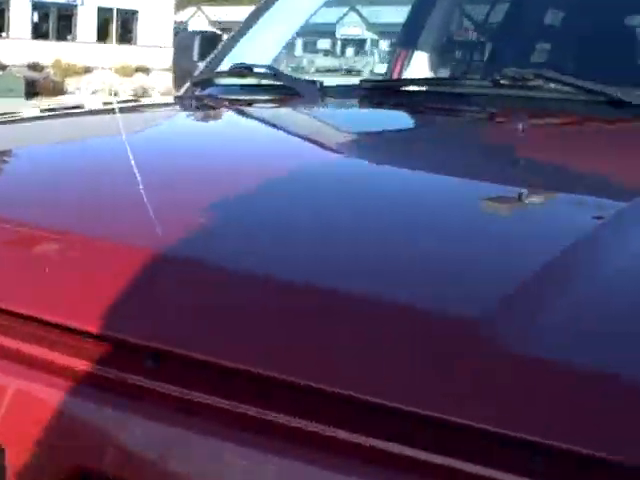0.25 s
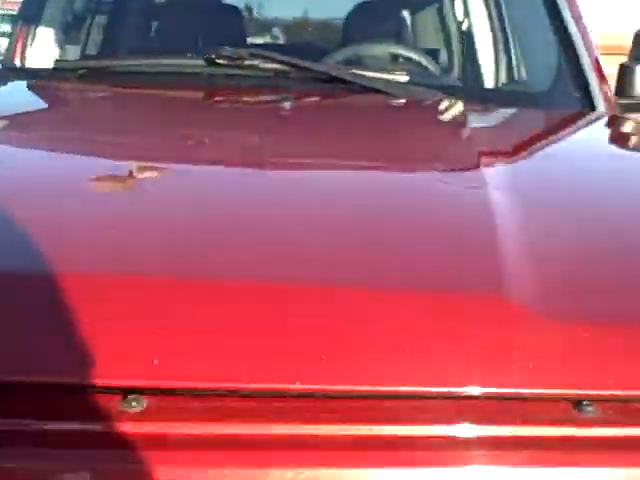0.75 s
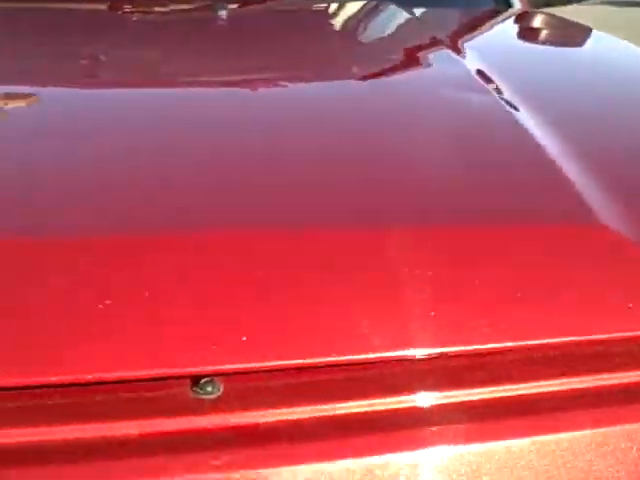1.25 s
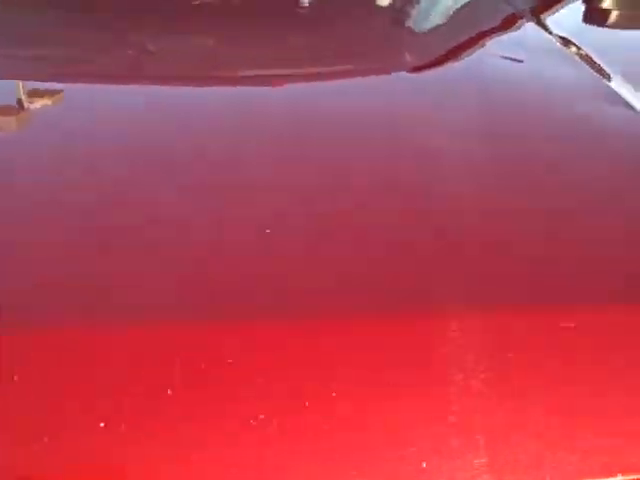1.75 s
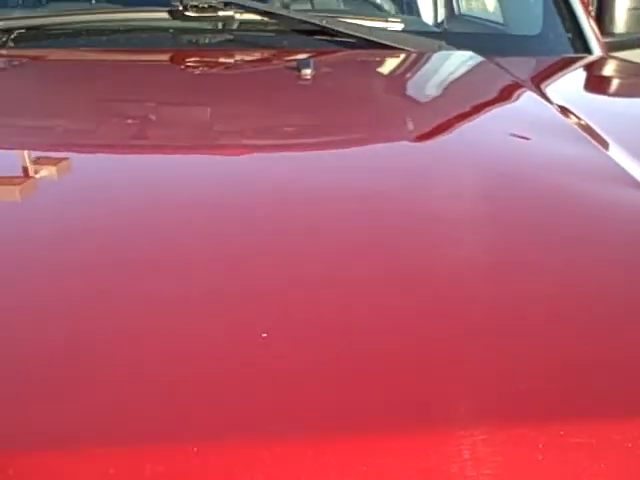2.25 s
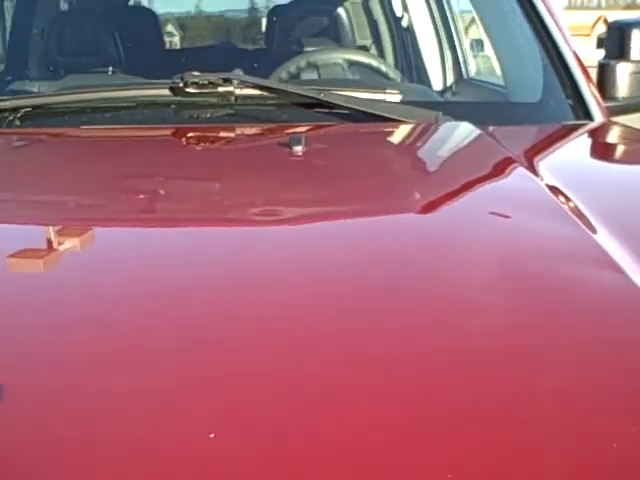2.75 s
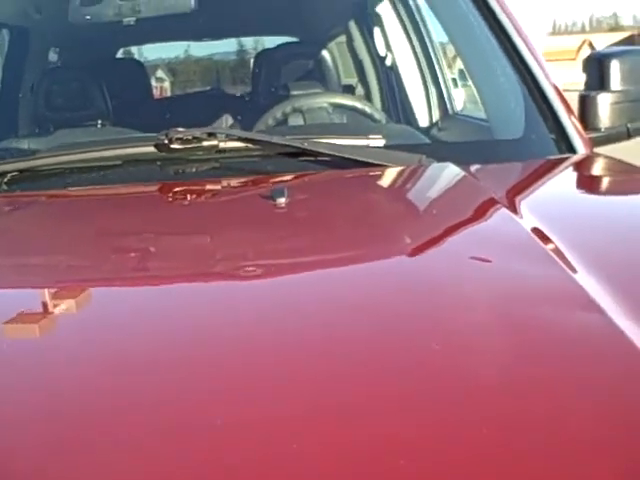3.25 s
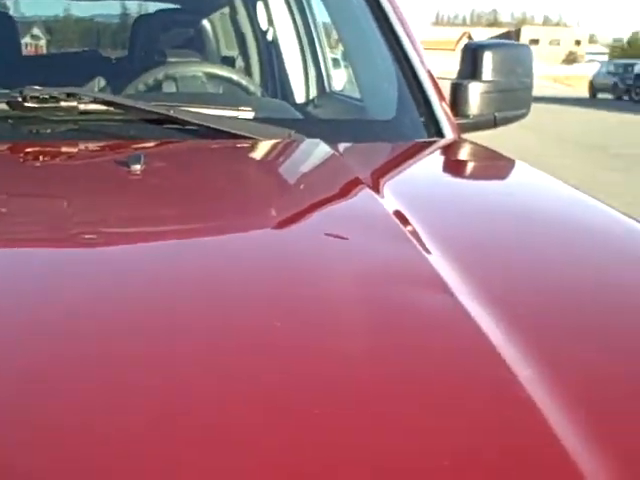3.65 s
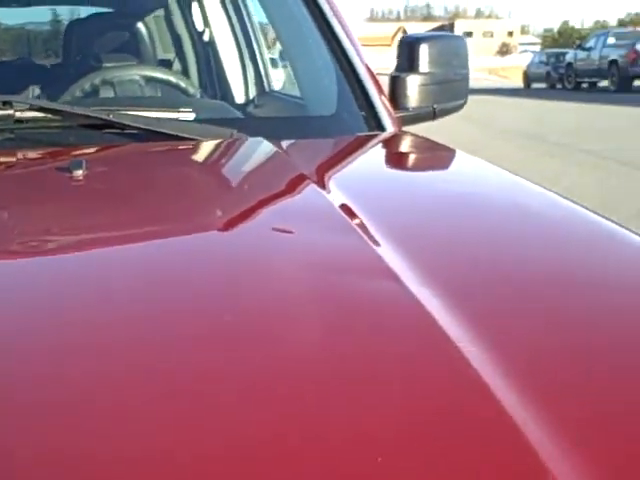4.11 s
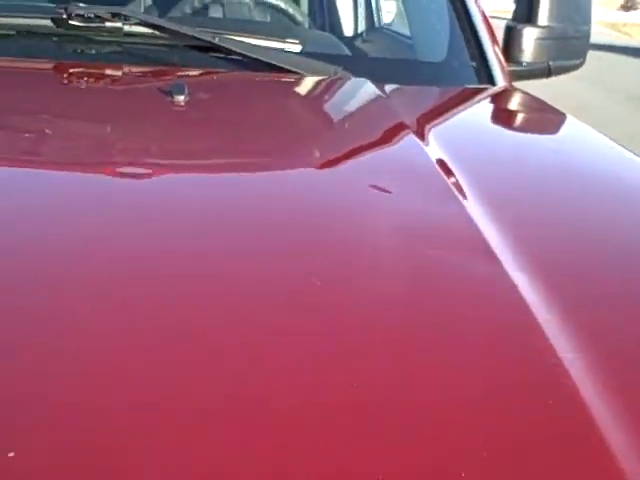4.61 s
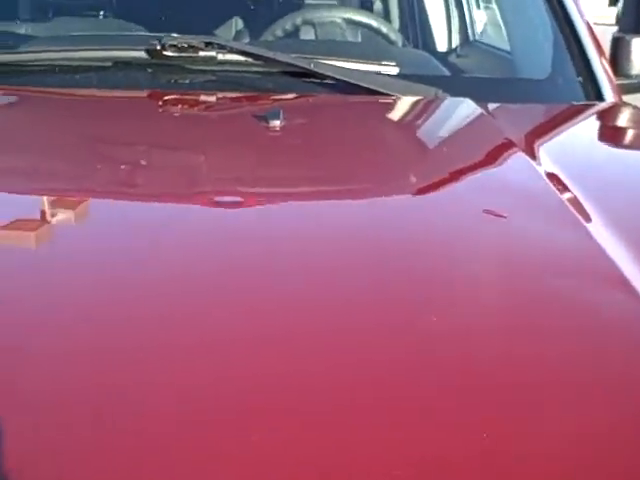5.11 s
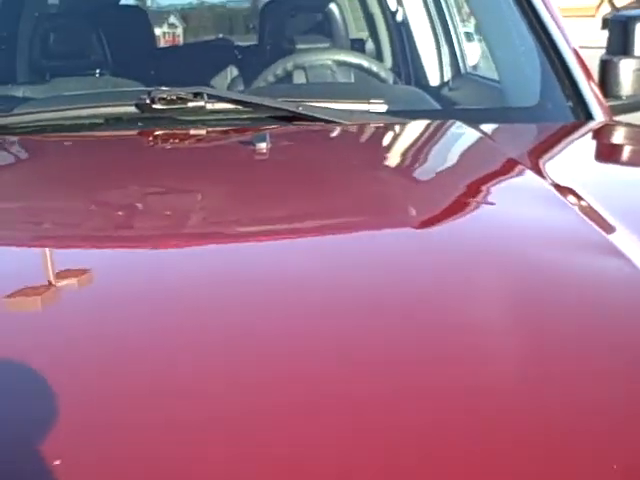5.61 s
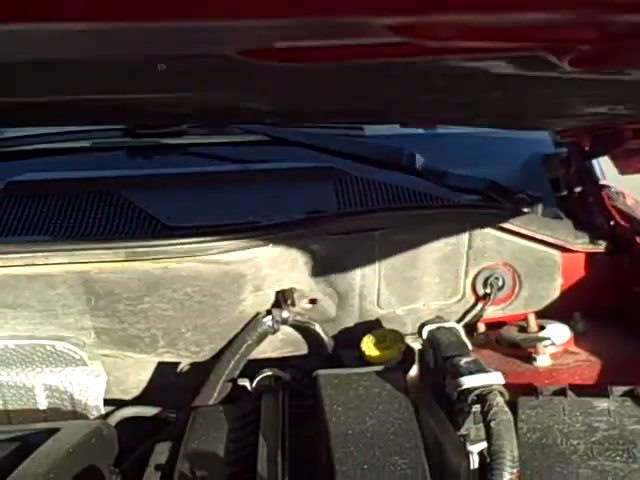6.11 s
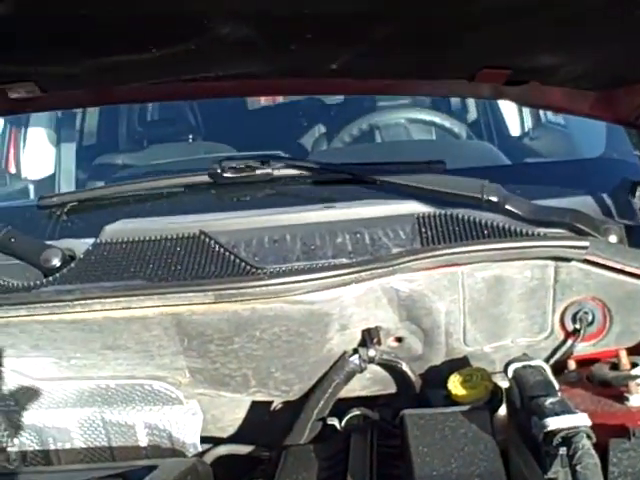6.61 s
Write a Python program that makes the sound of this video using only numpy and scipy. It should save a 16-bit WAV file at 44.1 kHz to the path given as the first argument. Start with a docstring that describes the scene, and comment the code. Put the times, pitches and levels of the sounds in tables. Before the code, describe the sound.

Close outdoor handling of a car hood: small clicks, a sharper double click and soft knocks, cloth rustle, gritty lever rubbing. A hard ringing clank pops the hood midway; later a rising creak leads to a bright metal snap, then short hinge groans and ticks. Faint wind, traffic and growing far engine hum underneath.

```python
"""A car hood is unlatched and lifted on an open lot: gusting wind, far traffic, a car drawing away, and a far
engine hum of wavering sines that mostly grows. Fingers click and rub at the latch (noise bursts, lever modes,
stick-slip pulses) and sleeves rustle; the hood pops up with a ringing clank (banded noise, modes, wash). The
safety catch creaks and snaps free, then the hinges groan and tick as the hood rises."""
import sys
import numpy as np
from scipy import signal
from scipy.fft import rfft, irfft, next_fast_len
from scipy.io import wavfile
from scipy.ndimage import uniform_filter1d

SR = 44100
rng = np.random.default_rng(int(sys.argv[2]) if len(sys.argv) > 2 else 0)


def log_audio(samples):
    """Write samples as a 16-bit WAV file to the path given in sys.argv[1]."""
    # one column per channel
    frames = np.atleast_2d(samples).T
    # limit to full scale, then quantise
    limited = np.clip(frames, -1, 1)
    pcm = np.round(limited * 32767).astype(np.int16)
    wavfile.write(sys.argv[1], SR, pcm)


N = 302790
TIME = np.arange(N) / SR
TOP_HZ = 16200

# Dull body of a contact. Each row: frequency in Hz, relative density in dB per Hz.
KNOCK_COLOUR = [(60, -14), (200, -6.5), (400, -3.5), (800, -0.5), (1150, -14.5), (1600, -19), (4000, -37)]
# Bright edge of a contact. Each row: frequency in Hz, relative density in dB per Hz.
TICK_COLOUR = [(1200, -35.5), (3500, 1.5), (6000, 1), (9000, 2), (12500, 0.5), (15500, 5.5)]


def amp(db):
    """Decibels to gain."""
    return 10 ** (np.asarray(db) / 20)


def unit(x):
    """Scale to rms 1."""
    return x / np.sqrt(np.mean(x ** 2) + 1e-18)


def curve(rows):
    """A control joined by straight lines in time."""
    seconds, value = np.transpose(rows)
    return np.interp(TIME, seconds, value)


def over_hz(rows, hz):
    """A table read on a log-frequency axis."""
    table_hz, value = np.transpose(rows)
    return np.interp(np.log(np.maximum(hz, 1)), np.log(table_hz), value)


def hiss(colour, size=N):
    """Noise of the given spectrum with random phases, rms 1."""
    length = 2 * next_fast_len(size // 2 + 1, real=True)
    hz = np.linspace(0, SR / 2, length // 2 + 1)
    phases = np.exp(2j * np.pi * rng.random(len(hz)))
    return unit(irfft(amp(over_hz(colour, hz)) * phases)[:size])


def fade(t60_s, size):
    """Exponential decay, 60 dB down after t60_s."""
    return np.exp(-np.log(1000) * np.arange(size) / SR / t60_s)


def add(out, start_s, sound):
    """Mix a sound in at start_s, cut at the end of the scene."""
    i = max(int(start_s * SR), 0)
    out[i:i + len(sound)] += sound[:max(N - i, 0)]


def walk(rate_hz):
    """Random drift at about rate_hz, rms 1."""
    hold = int(SR / rate_hz)
    steps = np.repeat(rng.standard_normal(N // hold + 1), hold)
    smooth = uniform_filter1d(uniform_filter1d(steps, hold), hold)
    return unit(smooth[:N])


def wind(breeze_db=-61, flutter_db=2):
    """Light air rumbles on the microphone; each gust is a smooth swell."""
    # Each row: frequency in Hz, relative density in dB per Hz.
    colour = [(15, 6), (40, 2.5), (70, 4), (120, -9), (300, -37), (1000, -67)]
    # Each row: peak time in seconds, length in seconds, level in dB.
    gusts = [(0.8, .1, -54.5), (1.6, 0.47, -48.5), (2.01, 0.23, -50), (4.22, .16, -44.5), (5.0, 0.23, -41),
             (5.28, .12, -41), (5.44, .2, -53), (5.69, .22, -42)]
    strength = amp(breeze_db + flutter_db * walk(5.2))
    for peak_s, length_s, db in gusts:
        swell = np.hanning(int(length_s * SR))
        add(strength, peak_s - length_s / 2, amp(db) * swell)
    return hiss(colour) * strength


def far_traffic():
    """Low-weighted noise of far traffic, with a brief low swell under the snap's tail and the hinges."""
    # Each row: frequency in Hz, relative density in dB per Hz.
    colour = [(30, -3), (70, -1.5), (140, 4), (250, -2), (400, -5.5), (900, -18), (1600, -22.5),
              (3000, -31), (8000, -40), (15500, -37.5)]
    # Level of this low noise, swell included. Each row: time in seconds, level in dB.
    level = [(0.0, -56.5), (2.41, -54), (3.52, -48.5), (5.01, -51), (5.51, -44.5), (5.74, -50.5),
             (6.58, -53), (6.87, -53.5)]
    return hiss(colour) * amp(curve(level))


def departing_tyres():
    """Tyre noise of a car drawing away, unsteady in level."""
    # Each row: frequency in Hz, relative density in dB per Hz.
    colour = [(300, -6.5), (900, -1.5), (1500, -11.5), (3000, -21.5), (8000, -35)]
    # Each row: time in seconds, level in dB before a 1 dB rms flutter.
    level = [(0, -59.5), (1, -61), (2, -68), (6.87, -69)]
    return hiss(colour) * amp(curve(level) + walk(9.5))


def engine_hum(waver_hz=1.21, flutter_db=2.5):
    """A far engine's lines, wavering in pitch and level."""
    # Each row: frequency in Hz, rms level in dB before nearness and flutter.
    lines = [(80.7, -53), (129.2, -60), (162, -62), (247.6, -61.5), (272, -65)]
    # Each row: time in seconds, gain in dB.
    nearness = [(0, -15), (1.2, -8), (2, -4.5), (3.5, -2), (4.7, 0.5), (6, 2), (6.87, -3)]
    out = np.zeros(N)
    for hz, db in lines:
        level = amp(db + flutter_db * walk(6.3))
        cycles = np.cumsum(hz + waver_hz * walk(4)) / SR
        out += level * np.sin(2 * np.pi * cycles)
    return np.sqrt(2) * out * amp(curve(nearness))


def sleeve(cloth_db=-70, skew=0.78, grain_db=1.5):
    """Grainy cloth hiss that swells and fades with each swipe over a steady faint rustle."""
    # Each row: frequency in Hz, relative density in dB per Hz.
    colour = [(200, -24), (800, 3), (2300, -3), (4000, -6), (7000, -4.5), (10000, -4), (13000, 0.5),
              (15500, -7.5)]
    # Swipes of hand and sleeve over paint. Each row: start in seconds, length in seconds, crest in dB.
    swipes = [(1.164, 1, -63.5), (1.675, 0.11, -49), (1.927, 0.17, -62), (2.19, 0.18, -61.5),
              (2.377, 0.11, -55), (2.52, 0.33, -60.5), (2.942, 0.4, -62), (3.77, 0.086, -53.5),
              (3.845, 0.18, -63.5), (4.372, 0.354, -52.5), (4.947, 0.078, -49.5), (5.425, 0.59, -63),
              (5.964, 0.31, -58.5), (6.369, 0.65, -60.5)]
    power = np.full(N, amp(cloth_db) ** 2)
    for start_s, length_s, db in swipes:
        progress = np.linspace(0, 1, int(length_s * SR))
        swell = np.abs(np.sin(np.pi * progress ** skew))
        add(power, start_s, amp(db) ** 2 * swell)
    return hiss(colour) * np.sqrt(power) * amp(grain_db * walk(300))


def hinge_ticks(t60_s=0.033, spread_db=3.0, size=2048):
    """Tiny bright ticks at random moments while the hood swings up."""
    # One row: from in seconds, to in seconds, ticks per second, median level in dB.
    start_s, end_s, ticks_per_s, db = (5.5, 8, 11, -53.5)
    at = (rng.random(N) < ticks_per_s / SR) & (TIME > start_s) & (TIME < end_s)
    sizes = at * amp(db + spread_db * rng.standard_normal(N))
    return hiss(TICK_COLOUR) * signal.oaconvolve(sizes, fade(t60_s, size))[:N]


def thuds(skirt_db=-22, size=8192):
    """A soft push on the flexing panel excites only a low, well damped part of it."""
    # Each row: start in seconds, centre in Hz, level in dB, t60 in seconds.
    pushes = [(0.05, 290, -32.5, 0.026), (1.598, 150, -39.5, .08), (5.643, 380, -37.5, 0.11),
              (5.70, 325, -44, 0.08), (6.795, 266, -38.5, 0.11)]
    out = np.zeros(N)
    for start_s, hz, db, t60_s in pushes:
        colour = [(hz / 2, skirt_db), (hz, 0), (2 * hz, skirt_db), (10 * hz, -80)]
        envelope = fade(t60_s, size) * (1 - fade(t60_s / 10, size))
        add(out, start_s, amp(db) * hiss(colour, size) * envelope)
    return out


def knocks(edge_db=-14, size=8192):
    """Blunt contacts with grille and bodywork: a dull body with a trace of edge."""
    # Each row: start in seconds, level in dB, body t60 in seconds.
    contacts = [(1.578, -45.5, .09), (1.755, -34.5, .073), (3.2209, -37, 0.15), (5.353, -40.5, .065)]
    out = np.zeros(N)
    for start_s, db, t60_s in contacts:
        body = hiss(KNOCK_COLOUR, size) * fade(t60_s, size)
        edge = amp(edge_db) * hiss(TICK_COLOUR, size) * fade(t60_s / 2, size)
        add(out, start_s, amp(db) * (body + edge))
    return out


def ring(modes, build_s, size=40000):
    """Lone modes (Hz, dB, t60 s) that build up as the blow spreads through the metal."""
    t = np.arange(size) / SR
    tones = np.zeros(size)
    for hz, db, t60_s in modes:
        tones += amp(db) * fade(t60_s, size) * np.sin(2 * np.pi * (hz * t + rng.random()))
    return tones * (1 - np.exp(-t / build_s))


def clicks(knock_db=-13, knock_hold=1.36, tick_hold=0.87, size=6144):
    """Light latch contacts: the dull body outlasts the lever's ring, the bright edge dies first."""
    # Lever and fingertips. Each row: start in seconds, lever ring in dB, bright edge in dB, ring t60 in seconds.
    contacts = [(0.185, -52, -35.5, 0.018), (0.6792, -48.5, -58, 0.021), (0.8482, -35, -25.5, 0.0097),
                (1.3943, -48.5, -49, 0.011), (1.4605, -41, -45.5, 0.01), (1.5959, -28, -42.5, .017),
                (1.7268, -50, -29.5, .011), (1.7461, -18.5, -19, 0.024), (2.0636, -35, -43, 0.022),
                (2.3578, -45.5, -47, 0.01), (2.372, -46, -46, 0.017), (2.8657, -40, -46, 0.018),
                (2.9176, -44, -55, 0.01), (2.999, -44, -44, 0.027), (3.1507, -43.5, -35, 0.037),
                (3.169, -37.5, -42.5, 0.027), (3.247, -58, -41, .054), (3.2677, -52, -43, 0.041),
                (3.6594, -49, -43.5, 0.035), (4.2978, -49.5, -47, 0.038), (4.312, -52.5, -43, 0.077),
                (4.5578, -52, -51, .08), (4.8, -57, -53, 0.025), (4.953, -32.5, -26.5, 0.029),
                (5.0252, -52, -38.5, 0.053), (6.1734, -60.5, -44.5, 0.065), (6.5596, -58, -44.5, 0.084),
                (6.7937, -39, -31, 0.021)]
    # Latch lever modes. Each row: frequency in Hz, relative level in dB.
    lever_modes = [(1210, -9.5), (1590, -5), (1760, -8.5), (2080, -5.5), (2440, -5.5), (2660, -8),
                   (3050, -17.5)]
    out = np.zeros(N)
    for start_s, ring_db, edge_db, t60_s in contacts:
        body = amp(knock_db) * hiss(KNOCK_COLOUR, size) * fade(t60_s * knock_hold, size)
        modes = [(hz, mode_db, t60_s) for hz, mode_db in lever_modes]
        lever = ring(modes, build_s=0.00013, size=size)
        edge = hiss(TICK_COLOUR, size) * fade(t60_s * tick_hold, size)
        add(out, start_s, amp(ring_db) * (body + lever) + amp(edge_db) * edge)
    return out


def stroke(length_s, crest, end_rate, crest_rate, jitter, scatter_db, grip_s=0.0066, slack_db=-5.5):
    """Stick-slip pulses: strength follows effort; slip rate moves from end to crest value, up or down."""
    t = TIME[:int(length_s * SR)]
    effort = np.sin(np.pi / 2 * np.interp(t / length_s, [0, crest, 1], [0, 1, 0])) ** 2
    slips_per_s = end_rate + (crest_rate - end_rate) * effort
    slips_per_s = slips_per_s * np.exp(jitter * walk(150)[:len(t)])
    slips = np.diff(np.floor(np.cumsum(slips_per_s) / SR), prepend=0)
    grip = np.minimum(1, np.minimum(t, length_s - t) / grip_s)
    strength = amp(slack_db * (1 - effort) + scatter_db * rng.standard_normal(len(t)))
    # the root evens out the power of dense and sparse slips
    return slips * grip * np.sqrt(SR / slips_per_s) * strength


def friction(strokes, parts, rough, jitter, scatter_db, size=4096):
    """Slips excite a body and a bright edge; the rough share of power is noise under their envelope."""
    out, pushes = np.zeros(N), np.zeros((2, N))
    for start_s, length_s, crest, end_rate, crest_rate, body_db, edge_db in strokes:
        pulses = stroke(length_s, crest, end_rate, crest_rate, jitter, scatter_db)
        add(pushes[0], start_s, amp(body_db) * pulses)
        add(pushes[1], start_s, amp(edge_db) * pulses)
    for push, (colour, t60_s, db) in zip(pushes, parts):
        decay = fade(t60_s, size)
        decay = decay / np.linalg.norm(decay)
        tone = signal.oaconvolve(push, hiss(colour, size) * decay)[:N]
        power = np.abs(signal.oaconvolve(push ** 2, decay ** 2)[:N])
        grit = hiss(colour) * np.sqrt(power)
        out += amp(db) * (np.sqrt(1 - rough) * tone + np.sqrt(rough) * grit)
    return out


def lever_rubs():
    """The latch lever rubs in gritty stick-slip strokes."""
    # Each row: start in seconds, length in seconds, crest as share of the length, slips per second at
    # the ends, slips per second at the crest, body drive in dB, edge drive in dB.
    rubs = [(2.585, 0.12, 0.58, 110, 175, -50.5, -49.5), (2.705, .095, 0.64, 115, 106, -46, -82),
            (2.79, 0.048, .5, 86, 105, -55.5, -58.5), (2.86, 0.12, 0.096, 45, 99, -49, -61),
            (3.02, 0.13, 0.19, 100, 92, -51, -49.5), (3.335, 0.16, 0.73, 45, 190, -54.5, -60),
            (3.73, .13, .5, 226, 260, -49, -59), (3.98, 0.11, 0.84, 153, 120, -48.5, -67)]
    # Each row: frequency in Hz, relative density in dB per Hz.
    body_colour = [(300, 4), (700, -1.5), (1200, -8), (1750, 3), (2600, -3), (3300, -13), (6000, -27),
                   (14000, -47)]
    parts = [(body_colour, 0.016, -1), (TICK_COLOUR, 0.006, -1)]  # colour, t60 s, dB
    return friction(rubs, parts, rough=0.56, jitter=0.11, scatter_db=1.5)


def creaks():
    """Catch and hinges creak: steadier stick-slip with a longer body."""
    # Each row: start in seconds, length in seconds, crest as share of the length, slips per second at
    # the ends, slips per second at the crest, body drive in dB, edge drive in dB.
    strokes = [(4.368, 0.18, 0.57, 170, 795, -43, -48), (4.572, 0.14, .6, 170, 277, -43.5, -53.5),
               (5.455, 0.11, .45, 95, 147, -47.5, -60.5), (5.575, .04, 0.497, 110, 130, -49.5, -60.5),
               (5.615, .11, .3, 70, 200, -48.5, -70)]
    # Each row: frequency in Hz, relative density in dB per Hz.
    body_colour = [(150, -5), (380, 4.5), (600, -14), (800, -2), (1100, -5), (1600, -6.5), (2400, -13),
                   (3300, -14), (6000, -25.5)]
    # Each row: frequency in Hz, relative density in dB per Hz.
    edge_colour = [(1500, -35), (3800, 0), (6000, 5), (9000, -0.5), (12000, -4), (15500, -19)]
    parts = [(body_colour, 0.04, 0), (edge_colour, 0.012, -1)]  # colour, t60 s, dB
    return friction(strokes, parts, rough=0.19, jitter=0.033, scatter_db=2.0)


def crash(colour, decay, rise_cycles=1.44, size=16384, count=14):
    """Dense metal resonances: every band swells over a cycle or so and dies at its own pace."""
    spectrum = rfft(hiss(colour, size))
    t = np.arange(size) / SR
    hz = np.linspace(0, SR / 2, len(spectrum))
    centres_hz = np.geomspace(80, TOP_HZ, count)
    out = np.zeros(size)
    # overlapping bands whose shares sum to one
    for centre_hz, share in zip(centres_hz, np.eye(count)):
        band = irfft(spectrum * over_hz(np.c_[centres_hz, share], hz))
        rise = 1 - np.exp(-t * centre_hz / rise_cycles)
        out += band * fade(over_hz(decay, centre_hz), size) * rise
    return out


def clank(blows, colour, decay, modes, crack_db, ring_db, wash_db, wash_t60_s, crack_t60_s=0.0076, size=2048):
    """Steel cracks on steel and rebounds; the struck part rings on over the wash of the hood."""
    # Many weak hood modes, blurred. Each row: frequency in Hz, relative density in dB per Hz.
    wash_colour = [(100, -1), (300, 4.5), (800, -2), (1400, -10), (2000, -5), (2600, -8.5), (3200, -19.5),
                   (5200, -20), (8000, -34.5), (15000, -47.5)]
    out = np.zeros(N)
    for blow_s, db in blows:
        add(out, blow_s, amp(db) * crash(colour, decay))
    start_s = blows[0][0]
    add(out, start_s, amp(crack_db) * hiss(TICK_COLOUR, size) * fade(crack_t60_s, size))
    add(out, start_s, amp(ring_db) * ring(modes, build_s=0.0018))
    add(out, start_s, amp(wash_db) * hiss(wash_colour, SR) * fade(wash_t60_s, SR))
    return out


def catch_snap():
    """The safety catch snaps free and rings on its bracket."""
    # Each row: time in seconds, level in dB.
    blows = [(5.2604, -8.5), (5.2688, -20.5)]
    # Each row: frequency in Hz, relative density in dB per Hz.
    colour = [(50, -10.5), (120, -3.5), (350, -8), (800, -3), (1700, 0), (2800, -1.5), (3900, 2),
              (5000, -2), (6500, 2), (9000, -9), (12000, 2), (15500, -5)]
    # Each row: frequency in Hz, t60 in seconds.
    decay = [(100, 0.56), (400, 0.25), (2000, 0.068), (5000, 0.067), (14000, .05)]
    # Catch on its bracket. Each row: frequency in Hz, relative level in dB, t60 in seconds.
    modes = [(312, -1.5, 0.24), (345, -11, 0.53), (404, 1.5, 0.25), (577, -1, 0.18), (810, -9, 0.25),
             (1050, -21, 0.1), (1418, -12, 0.28), (1644, -6.5, 0.13), (2013, -4.5, 0.13),
             (2530, -15.5, 0.15), (4240, -6.5, 0.082), (4522, -5.5, 0.08), (5308, -28, .2),
             (5500, -13, 0.055)]
    return clank(blows, colour, decay, modes, crack_db=-6.0, ring_db=-23.0, wash_db=-35.5, wash_t60_s=0.36)


def hood_pop():
    """The latch lets go in a burst of blows and the hood panel rings."""
    # Each row: time in seconds, level in dB.
    blows = [(3.5037, -10), (3.5207, -16), (3.5252, -21), (3.5320, -23)]
    # Each row: frequency in Hz, relative density in dB per Hz.
    colour = [(50, -25.5), (110, -5.5), (400, 1), (950, -3), (1500, -8), (2400, -3), (3200, -12.5),
              (5500, -12), (7500, -13), (9500, -2), (15000, -11)]
    # Each row: frequency in Hz, t60 in seconds.
    decay = [(100, 0.37), (400, 0.18), (2000, 0.11), (5000, 0.07), (14000, 0.035)]
    # Hood panel. Each row: frequency in Hz, relative level in dB, t60 in seconds.
    modes = [(259, -8.5, 0.46), (310.5, -1.5, 0.26), (342, -8.5, 0.25), (407, 5.5, .17), (446, 4.5, 0.16),
             (494, -21.5, 1.4), (550, -6, 0.1), (681, -22, 0.8), (748, -9.5, 0.6), (820, -2, 0.16),
             (990, -3.5, 0.23), (1122, -10.5, 0.16), (1146, -20.5, 0.52), (1900, -24, 0.99),
             (1953, -31, 0.7), (2020, -37, 0.71), (2190, -30, 0.74), (2260, -29, 0.82), (2310, -24, 0.59),
             (2417, -40, 0.6), (2490, -13, 0.32), (2570, -29, 1.1), (3880, 2.5, 0.052), (4570, -29.5, 0.46),
             (4800, -20.5, 0.25), (5270, -34, 0.4), (5540, -31.5, 0.44), (5720, 2, 0.052)]
    return clank(blows, colour, decay, modes, crack_db=-8.0, ring_db=-20.5, wash_db=-35, wash_t60_s=0.73)


def scene():
    """Latch, catch and hinges in the open air, one channel."""
    background = wind() + far_traffic() + departing_tyres() + engine_hum()
    handling = sleeve() + hinge_ticks() + thuds() + knocks() + clicks()
    rubbing = lever_rubs() + creaks()
    clanks = catch_snap() + hood_pop()
    return (background + handling + rubbing + clanks)[None]


def record(dry):
    """Soft saturation rounds the loudest peaks; a steep low-pass cuts above TOP_HZ."""
    rounded = np.tanh(0.89 * dry) / 0.91
    low_pass = signal.ellip(10, 0.2, 80, TOP_HZ, fs=SR, output="sos")
    return signal.sosfilt(low_pass, rounded)


dry = scene()
out = record(dry)
log_audio(out)
```